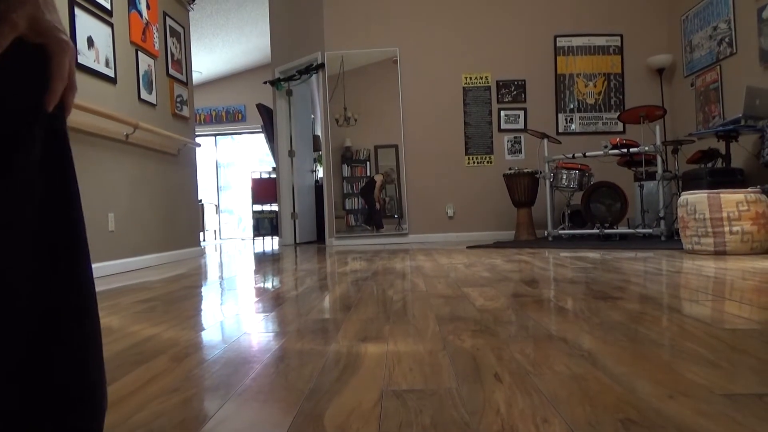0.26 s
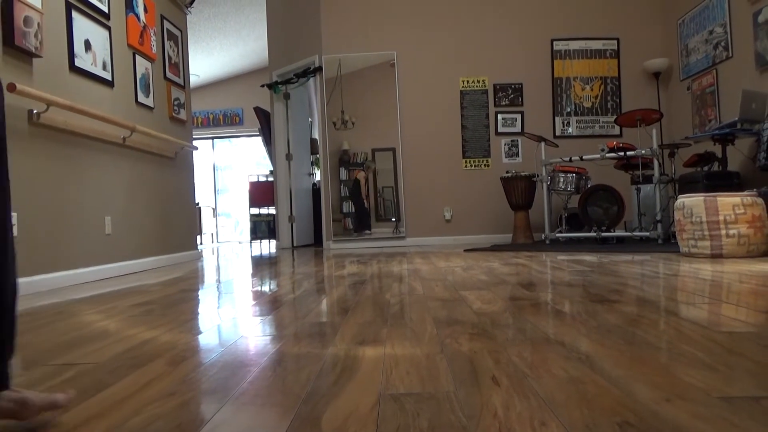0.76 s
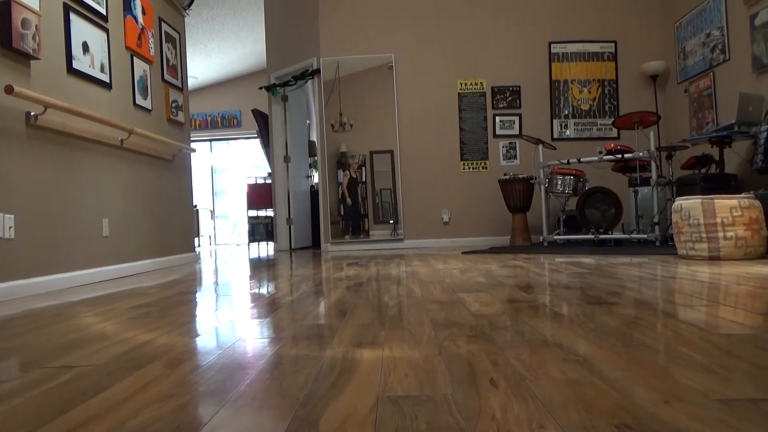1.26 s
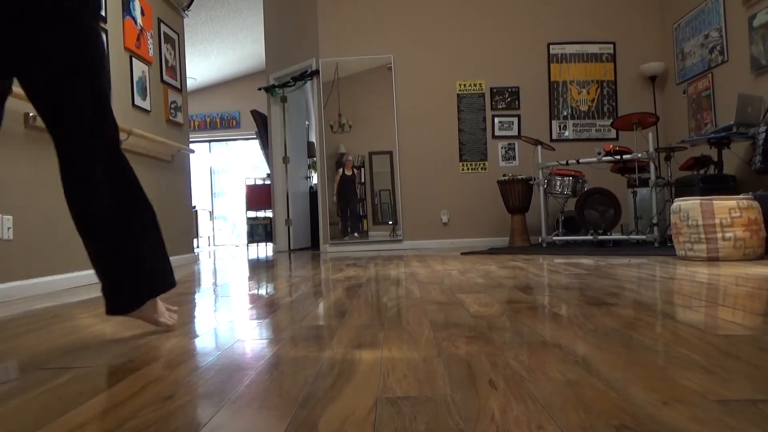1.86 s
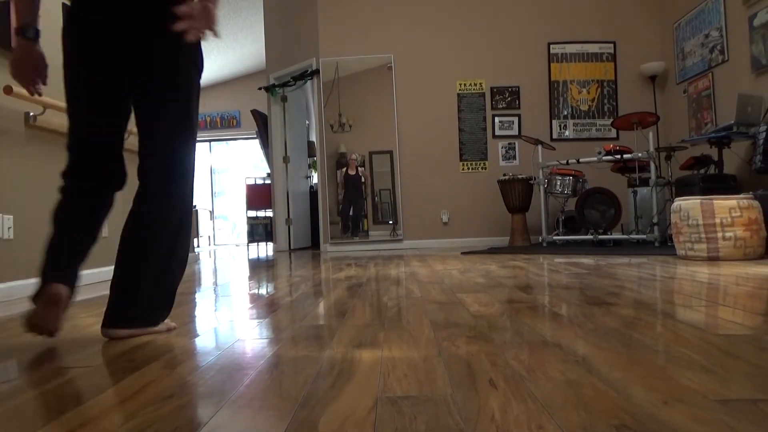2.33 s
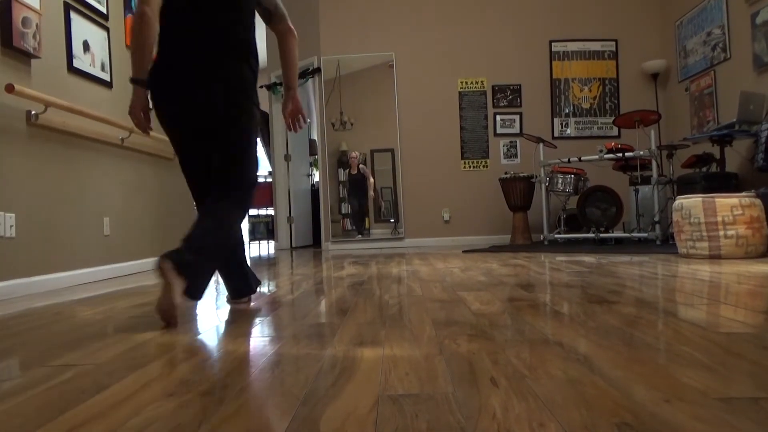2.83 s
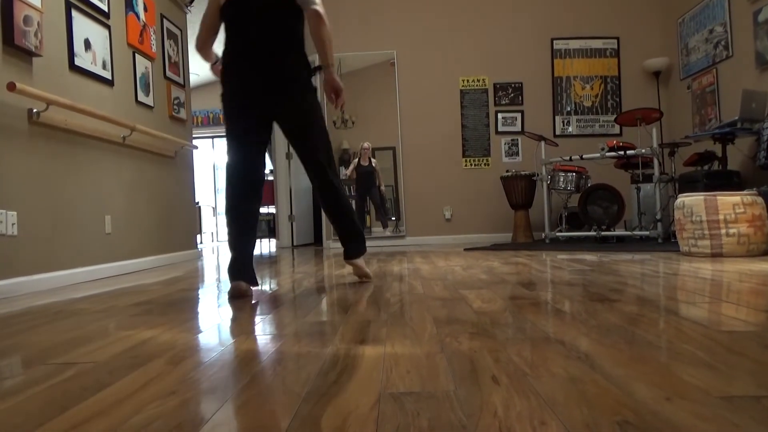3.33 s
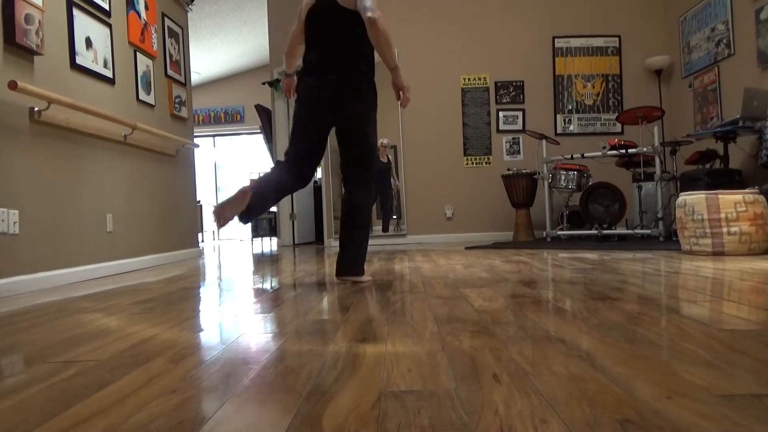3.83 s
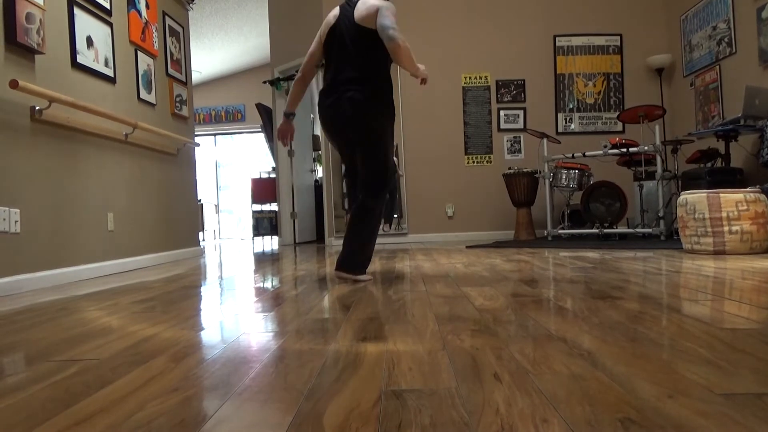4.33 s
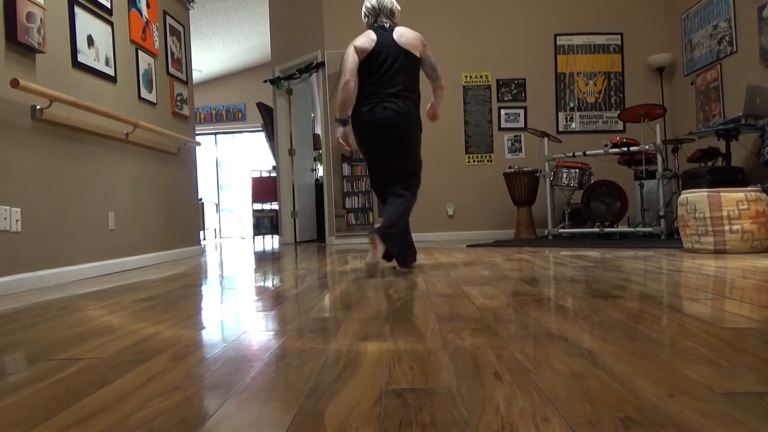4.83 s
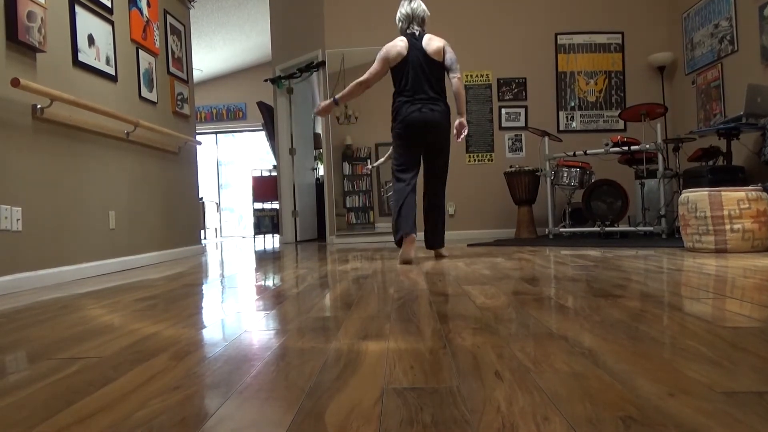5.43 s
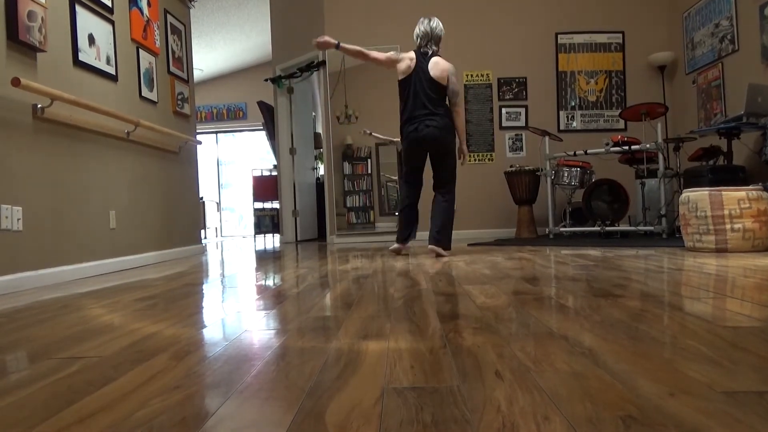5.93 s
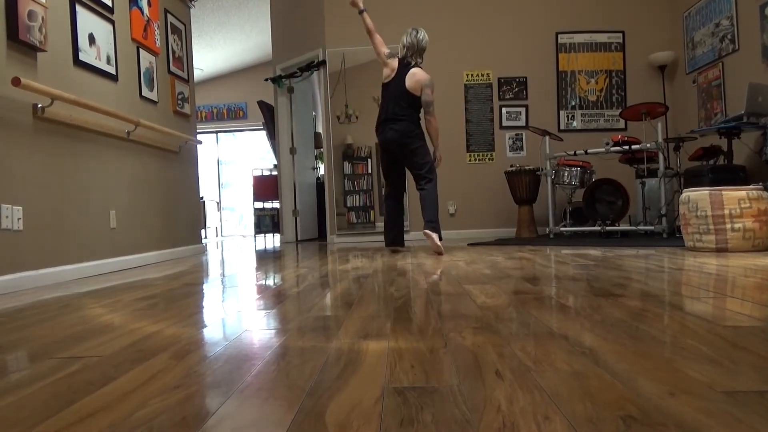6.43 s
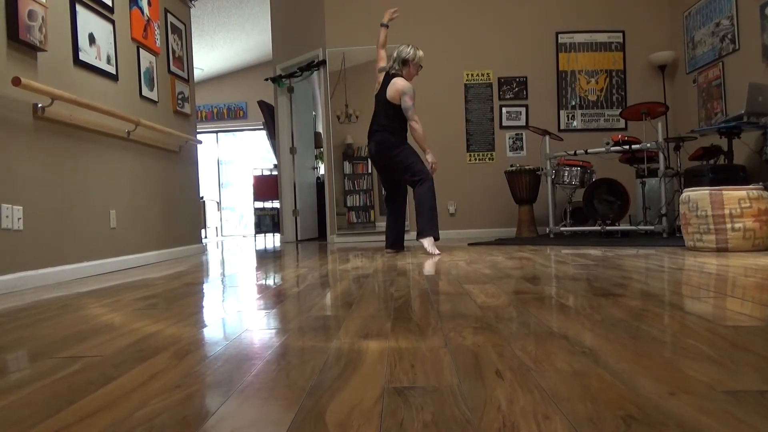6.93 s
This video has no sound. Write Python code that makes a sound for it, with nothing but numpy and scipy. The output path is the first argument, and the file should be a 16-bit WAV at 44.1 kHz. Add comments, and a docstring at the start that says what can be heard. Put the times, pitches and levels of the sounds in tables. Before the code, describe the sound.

A barefoot dancer moves over a varnished hardwood floor in a small reverberant studio. Skin snaps, light board knocks and brief swishing slides come in irregular steps, close and left at first, then drifting to the middle with more room ring. Soft low booms join from about two seconds. The strongest scuffs come just before six seconds, above a constant low ventilation hum that pulses about twice a second.

```python
"""Bare feet dance across a hardwood floor in a small, live studio, over ventilation that hums and throbs throughout.
From the start, skin snaps and a board knocks in each scuff; the sole slides on in a swish of tiny slips that
catches here and there. Taps, knockless skims and faint peels fall among the scuffs, and the room rings.
From about 2 s the floor booms in its low modes. The feet begin at the left and drift to the middle by about 5.8 s,
then return a little to the left; the room answers more strongly after the start, and the snaps slowly dull."""
import sys
import numpy as np
from scipy import signal
from scipy.fft import rfft, irfft, next_fast_len
from scipy.io import wavfile
from scipy.ndimage import uniform_filter1d

SR = 44100
rng = np.random.default_rng(int(sys.argv[2]) if len(sys.argv) > 2 else 0)


def store_wav(level_fs):
    """Save 16-bit WAV to argv[1]."""
    pcm = np.round(np.clip(np.atleast_2d(level_fs), -1, 1) * 32767)
    wavfile.write(sys.argv[1], SR, pcm.T.astype(np.int16))


N = 316139
TIME = np.arange(N) / SR

# Ventilation air noise: f/Hz, relative level per Hz/dB
AIR_SPECTRUM = [(12, -51), (20, -30), (40, -5.5), (70, -4.5), (98, -9), (168, -7), (241, -16), (270, -19.5),
                (399, -24), (434, -26.5), (802, -29.5), (1030, -31.5), (2320, -39), (8650, -43.5),
                (16000, -50)]
AIR_DB = -45.5  # rms of the middle signal
# Steady fan and mains tones: f/Hz, nominal rms level/dB
HUM_TONES = [(36.2, -64), (59, -59.5), (76.6, -58), (120, -54), (202.5, -65), (240, -66), (360, -74),
             (405, -67.5), (1004, -75.5)]
# Passing swells of the hum: t/s of the crest, half length/s (to 1/e), f/Hz, nominal crest rms level/dB
HUM_SWELLS = [(3.964, 0.18, 396, -63), (4.425, 0.12, 394.5, -59.5), (6.004, 0.07, 365, -57.5)]
# Duct rumble: centre f/Hz, rms level/dB; beats per second, t/s of a crest
THROB_HZ, THROB_DB = 70.54, -48.5
BEAT_RATE, BEAT_CREST_S = 1.92, 0.2

# Reverberation of the room: f/Hz, time to fall 60 dB/s
ROOM_T60 = [(250, 2.1), (1000, 1.7), (3500, 0.72), (8000, 0.72), (16000, 1.37)]
# Colour of the reverberation: f/Hz, relative level/dB
ROOM_COLOUR = [(100, 17), (700, -1), (1500, -2), (3500, 4.5), (9000, 3.5), (12000, -1.5), (16000, 10)]
# Stereo width: the side is strong in the middle range, weak in bass and treble:
# f/Hz, side level/dB before the offset of each layer
STEREO_WIDTH = [(60, -60), (110, -47), (200, -23.5), (380, -8.5), (700, -4), (1290, -1), (2400, -1),
                (4400, -3.5), (8000, -34.5), (15000, -49)]
# Path of the dancer: t/s, level sent to the room against direct sound/dB, left minus right level/dB
DANCER_PATH = [(0, -9, 5), (1.3, -7.5, 5), (2.1, -3.5, 2.5), (3.5, 0, 1.2), (5.8, -1.5, -0.3),
               (7, -1.5, 2.5)]

# Weight coming down on the floor: t/s, level/dB before the mode and layer gains
FOOTFALLS = [(2.139, -43), (2.3, -40), (2.785, -47.5), (3.321, -47), (3.92, -46), (4.137, -44),
             (4.835, -44), (5.14, -43), (5.371, -43.5), (5.887, -41), (6.319, -40.5)]
# Floor modes: f/Hz, relative level/dB, time to fall 60 dB/s
FLOOR_MODES = [(80.5, 0.5, 1), (133, 1, 0.72), (187, -3, 0.41), (347, -14.5, 0.22)]

# Skin snapping off varnish: f/Hz, relative level/dB
SNAP_SPECTRUM = [(100, -22), (500, 0.5), (1500, 1.5), (9000, 2), (12000, -4.5), (16000, -22)]
# Skin rubbing on varnish: f/Hz, relative level/dB
RUB_SPECTRUM = [(150, -19), (600, 0), (1200, -0.5), (2200, -1), (3800, 1), (6000, -1.5), (9300, -1.5),
                (12000, -14), (16000, -53)]
# In the next three tables levels are before the layer gains of soles().
# A sole lands and slides on: t/s, knock energy level/dB, knock f/Hz, knock width/octaves,
# snap energy level/dB, slide length/s, slide level/dB, slide tilt/(dB per octave)
SCUFFS = [(0.0296, -12, 1500, 2.0, -13.5, 0.026, -48.5, 3), (0.5754, -18, 930, 2, -11, 0.14, -52, -.3),
          (1.276, -20.5, 1870, 1.7, -24, 0.086, -57.5, -1), (1.406, -24, 3610, 0.95, -28, 0.011, -47, -2),
          (1.6655, -31, 1700, 0.64, -18.5, 0.076, -61.5, 5), (2.0344, -7, 2560, 1.42, -18, 0.1, -45, .5),
          (2.163, -19, 1300, 2.4, -30, 0.092, -52.5, -2.5),
          (2.7824, -22, 3100, 0.53, -24, 0.12, -54.5, -2.5),
          (3.3204, -27, 830, 0.76, -18.5, 0.17, -57.5, -1.5), (3.5096, -25, 2580, .4, -20, 0.093, -48, .5),
          (3.9175, -23, 1970, 1.2, -21, 0.072, -55, 1.5), (4.1369, -18, 2400, 0.69, -25, 0.087, -55, 0),
          (4.789, -22, 2990, .9, -22.5, 0.092, -52, 4), (5.13, -23, 2390, 0.56, -27, 0.081, -51.5, 1.5),
          (5.362, -28, 2644, 0.29, -28.5, 0.097, -52, -1), (5.4723, -24, 2490, 0.61, -27, 0.077, -49, -2.5),
          (5.785, -8.5, 2560, 1.26, -12, 0.07, -37, 0.8), (5.8817, -9.5, 2630, 1.6, -9, 0.086, -41, -0.5),
          (6.3056, -23.5, 7740, 1.3, -25.5, .14, -53.5, -.5),
          (6.7316, -21.5, 1890, 1.4, -29, 0.076, -48.5, -2.5)]
# A heel or toe taps without sliding: t/s, knock energy level/dB, knock f/Hz, knock width/octaves,
# snap energy level/dB
TAPS = [(0.0147, -26.5, 8930, .65, -22), (0.038, -15, 8900, 0.52, -15), (0.1462, -20, 696, 0.91, -35.5),
        (0.452, -27.5, 3220, 0.59, -44), (0.521, -26, 1505, 2.1, -25.5), (0.6814, -14.5, 1630, 0.61, -12),
        (1.3484, -23, 3500, .6, -32), (2.066, -16, 4830, 0.46, -40), (2.2038, -20, 1550, 2, -38),
        (2.8092, -19.5, 2280, 0.66, -28), (2.8606, -17, 8800, 1.1, -16.5), (2.8692, -14, 1730, 2.3, -18),
        (3.644, -22, 1840, 0.75, -32), (4.8358, -23.5, 1995, .5, -18.5), (5.151, -17.5, 6440, .7, -40),
        (5.1638, -19.5, 1760, 1.8, -40), (5.805, -10, 6000, .7, -23), (5.9018, -12.5, 5600, 0.34, -15),
        (5.922, -12.5, 3940, 0.38, -20), (6.1697, -29.5, 2880, 0.35, -39), (6.326, -18.5, 6750, 1.2, -32),
        (6.42, -28, 5550, .6, -29)]
# A sole skims without a knock: t/s, length/s, level/dB, tilt/(dB per octave)
DRAGS = [(0.36, .12, -59, -1), (0.535, 0.044, -50.5, 0), (1.098, .1, -60, -1.5), (2.83, .04, -57.5, 1),
         (6.0, 0.035, -50, 2)]

# Soft onset before the spike: time constant/s, level against the rattle/dB
ONSET_S, ONSET_DB = 0.004, -19
# The wider the knock, the more of its push energy lies in a clean spike
SPIKE_SHARE_PER_OCTAVE = 0.22
# Peels: highest knock level/dB before the layer gain, range below it/dB, middle f/Hz, width/octaves, snap/dB
PEEL_DB, PEEL_RANGE_DB, PEEL_HZ, PEEL_WIDTH_OCTAVES, PEEL_SNAP_DB = -28.5, 5, 2800, 0.64, -40
# Slide delay after the touch/s; fall over a scuff and rise over a drag/dB
SLIDE_LAG_S, SLIDE_FALL_DB, DRAG_RISE_DB = 0.005, 5.5, 6.5
# Catches: mean rate per second, knock against slide level/dB, its scatter/dB, snap against knock/dB
CATCH_RATE, CATCH_DB, CATCH_SCATTER_DB, CATCH_SNAP_DB = 16, 19.5, 3.1, -16
# Catch knocks: middle f/Hz, its scatter/octaves, width/octaves
CATCH_HZ, CATCH_SCATTER_OCTAVES, CATCH_WIDTH_OCTAVES = 4000, 0.44, 0.92

TOP_HZ = 16100  # upper limit of the pass band


def undb(db):
    """Level law: the amplitude gain of a level in decibels."""
    return 10 ** (np.asarray(db) / 20)


def unit(x):
    """Normalisation: scale to an rms of 1."""
    return x / np.sqrt(np.mean(x ** 2))


def freqs(n):
    """Discrete spectrum: the frequencies of n samples, kept at 1 Hz or more."""
    return np.maximum(np.arange(n // 2 + 1) * SR / n, 1)


def curve(points, hz):
    """Log-frequency interpolation: read (f, value) points between their entries."""
    f, value = np.transpose(points)
    return np.interp(np.log(hz), np.log(f), value)


def shape(x, gain):
    """Linear filtering: multiply the spectrum by a gain per frequency."""
    return irfft(rfft(x) * gain, len(x))


def resonance(f, hz, q):
    """Resonance: the gain of a second-order band-pass applied twice."""
    return 1 / (1 + (q * (f / hz - hz / f)) ** 2)


def decay(t, t60):
    """Exponential decay: fall by 60 dB in t60 seconds."""
    return np.exp(-np.log(1000) * t / t60)


def walk(rate):
    """Random fluctuation: levels held for 1 / rate s, smoothed twice, of rms 1."""
    hold = max(int(SR / rate), 1)
    steps = np.repeat(rng.standard_normal(N // hold + 1), hold)
    return unit(uniform_filter1d(uniform_filter1d(steps, hold), hold)[:N])


def add(track, start, x):
    """Superposition: mix x into the track from a time in s."""
    i = max(int(start * SR), 0)
    track[i:i + len(x)] += x[:N - i]


def spread(mid, side, side_db):
    """Stereo width: the side is strong in the middle range, weak in bass and treble."""
    side = shape(side, undb(curve(STEREO_WIDTH, freqs(len(side))) + side_db))
    return np.array([mid + side, mid - side])


def tone(hz, db, waver_db=1.54, drift_hz=0.353):
    """Amplitude and frequency modulation: a sine that wavers a little in level and pitch."""
    level = undb(db + waver_db * walk(3.065))
    cycles = np.cumsum(hz + drift_hz * walk(3.996)) / SR
    return np.sqrt(2) * level * np.sin(2 * np.pi * cycles)


def ventilation(throb_depth=1.0, throb_q=2.7, throb_tone_db=2):
    """Flow noise and beating: air noise, fan and mains tones, and a duct rumble swelling about twice a second."""
    size = next_fast_len(N)
    f = freqs(size)
    mid, side = (unit(shape(rng.standard_normal(size), undb(curve(AIR_SPECTRUM, f)))) for _ in range(2))
    air = undb(AIR_DB) * spread(mid, side, side_db=-0.5)[:, :N]

    hum = sum(tone(hz, db) for hz, db in HUM_TONES)
    for crest, half_length, hz, db in HUM_SWELLS:
        hum += tone(hz, db) * np.exp(-((TIME - crest) / half_length) ** 2)

    duct_noise = unit(shape(rng.standard_normal(size), resonance(f, THROB_HZ, throb_q))[:N])
    rumble = duct_noise + tone(THROB_HZ, throb_tone_db)
    beat = 1 + throb_depth * np.cos(2 * np.pi * BEAT_RATE * (TIME - BEAT_CREST_S))
    return air + hum + undb(THROB_DB) * unit(rumble * beat)


def room_response(gap_s=0.012, build_s=0.023, lumpy_db=4.5, merge_s=0.068, size=44100):
    """Reverberation: uneven wall echoes thicken into a tail whose decay time depends on frequency."""
    t, f = np.arange(size) / SR, freqs(size)
    lumps = undb(lumpy_db * rng.exponential(size=size) * np.exp(-t / merge_s))
    echoes = rng.standard_normal(size) * lumps
    tail = 0
    for hz in 125 * 2. ** np.arange(8):  # overlapping octave bands
        band = np.maximum(1 - abs(np.log2(f / hz)), 0) * undb(curve(ROOM_COLOUR, f))
        tail = tail + shape(echoes, band) * decay(t, curve(ROOM_T60, hz))
    build = 1 - np.exp(-np.maximum(t - gap_s, 0) / build_s)
    return unit(tail * build) / np.sqrt(size)


def studio(feet, side_db=-6, count=16):
    """Convolution: the send follows the dancer's path, and each stretch of time has its own echoes."""
    s, room_db, _ = np.transpose(DANCER_PATH)
    send = feet * undb(np.interp(TIME, s, room_db))
    out = np.zeros((2, N))
    for stay in np.array_split(np.arange(N), count):
        responses = spread(room_response(size=32768), room_response(size=32768), side_db)
        for channel, response in zip(out, responses):
            add(channel, TIME[stay[0]], signal.fftconvolve(send[stay], response))
    return out


def footfalls(load_s=0.0071, mode_q=3.1, size=22050):
    """Modal excitation: a soft heel loads the floor slowly, so only its broad low modes answer."""
    out, f, t = np.zeros(N), freqs(size), np.arange(size) / SR
    for s, db in FOOTFALLS:
        boom = 0
        for hz, mode_db, t60 in FLOOR_MODES:
            mode = unit(shape(rng.standard_normal(size), resonance(f, hz, mode_q)))
            boom = boom + undb(mode_db) * mode * decay(t, t60)
        add(out, s, undb(db) * boom * (1 - np.exp(-t / load_s)))
    return out


def peels(count=12):
    """Adhesion: skin unsticks faintly from the varnish as weight shifts, at random moments; rows like TAPS."""
    rows = []
    for when, weak, pitch in rng.random((count, 3)):
        knock_db = PEEL_DB - PEEL_RANGE_DB * weak
        hz = PEEL_HZ * 2 ** (pitch - 0.5)
        rows.append((when * TIME[-1], knock_db, hz, PEEL_WIDTH_OCTAVES, PEEL_SNAP_DB))
    return rows


def catches(count=4):
    """Irregular friction: sliding skin catches at random, harder in louder slides; rows like TAPS."""
    rows = []
    for s, *_, length, db, _ in SCUFFS:
        delays = np.cumsum(rng.exponential(size=count)) / CATCH_RATE
        for delay, (strength, pitch) in zip(delays, rng.standard_normal((count, 2))):
            knock_db = db + CATCH_DB + CATCH_SCATTER_DB * strength
            hz = CATCH_HZ * 2 ** (CATCH_SCATTER_OCTAVES * pitch)
            if delay < length:
                rows.append((s + delay, knock_db, hz, CATCH_WIDTH_OCTAVES, knock_db + CATCH_SNAP_DB))
    return rows


def slides(strokes, fall_db, slip_rate=4500, scatter_db=3.0, edge_s=0.003, release_s=0.024,
           judder_db=1.03, size=16384):
    """Stick-slip friction: thousands of slips a second, most of them tiny, under uneven pressure."""
    out, f, t = np.zeros(N), freqs(size), np.arange(size) / SR
    for s, length, db, tilt_db in strokes:
        slip_db = scatter_db * np.minimum(rng.exponential(size=size), 4)
        sizes = rng.choice([-1, 1], size) * undb(slip_db)
        slips = sizes * (rng.random(size) < slip_rate / SR)
        rub = unit(shape(slips, undb(curve(RUB_SPECTRUM, f) + tilt_db * np.log2(f))))
        pressure = np.minimum(t / edge_s, 1) * np.exp(-np.maximum(t - length, 0) / release_s)
        trend_db = -fall_db * (np.minimum(t / length, 1) - 0.5)  # zero halfway along
        add(out, s, rub * pressure * undb(db + trend_db))
    return out * undb(judder_db * walk(220))


def ticks(contacts, lead_s=0.0011, ring_s=0.0019, tail_s=0.035, tail_db=-22, size=2048):
    """Impact and dispersion: a soft onset, then a spike in a short board rattle whose fast bending waves lead."""
    out, f = np.zeros(N), freqs(size)
    t = (np.arange(size) - size // 4) / SR  # the spike falls at t = 0
    before = np.exp(-abs(t) / lead_s) + undb(ONSET_DB) * np.exp(-abs(t) / ONSET_S)
    after = np.exp(-abs(t) / ring_s) + undb(tail_db) * np.exp(-abs(t) / tail_s)
    envelope = np.where(t < 0, before, after)
    spike = unit(1. * (t == 0))
    snap = unit(undb(curve(SNAP_SPECTRUM, f)))
    noises = rng.standard_normal((len(contacts), size))
    for (s, knock_db, hz, octaves, snap_db), noise in zip(contacts, noises):
        clean = np.clip(SPIKE_SHARE_PER_OCTAVE * octaves, 0, 1)
        rattle = unit(noise * envelope)
        push = np.sqrt(clean) * spike + np.sqrt(1 - clean) * rattle
        knock = unit(snap * 2 ** (-2 * (np.log2(f / hz) / octaves) ** 2))
        colour = np.hypot(undb(knock_db) * knock, undb(snap_db) * snap)  # energies add
        add(out, s + t[0], unit(shape(push, colour)) * np.sqrt(np.mean(colour ** 2) / size))
    return out


def dull_slowly(x, dull_hz=11000, end_share=0.32):
    """Treble loss over time: a dulled copy gradually replaces part of the snaps."""
    dull = shape(x, 1 / (1 + (freqs(N) / dull_hz) ** 10))
    return x + (dull - x) * np.clip(end_share, 0, 1) * TIME / TIME[-1]


def soles(tick_db=-0.8, slide_db=-2.5):
    """Impact followed by friction: scuffs touch, then slide and fade; drags swell, taps only tick."""
    touches = [row[:5] for row in SCUFFS]
    strokes = [(s + SLIDE_LAG_S, length, db, tilt_db) for s, *_, length, db, tilt_db in SCUFFS]
    rubbing = slides(strokes, SLIDE_FALL_DB) + slides(DRAGS, -DRAG_RISE_DB)
    ticking = dull_slowly(ticks(touches + TAPS + catches() + peels()))
    return undb(slide_db) * rubbing + undb(tick_db) * ticking


def scene(boom_db=-3):
    """Superposition: low background, room sound, and direct feet placed by a level difference."""
    low = undb(boom_db) * footfalls() + ventilation()
    feet = soles()
    s, _, pan_db = np.transpose(DANCER_PATH)
    pan_db = np.interp(TIME, s, pan_db)
    direct = feet * undb(np.array([pan_db, -pan_db]) / 2)
    return direct + studio(feet) + low


def record(dry):
    """Band limiting: a steep elliptic low-pass cuts the top."""
    return signal.sosfilt(signal.ellip(10, 0.2, 70, TOP_HZ, fs=SR, output="sos"), dry)


dry = scene()
out = record(dry)
store_wav(out)
```